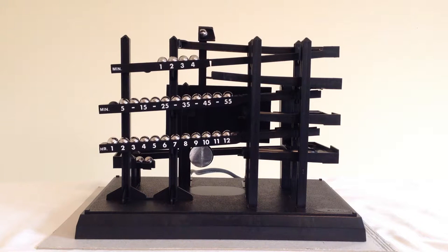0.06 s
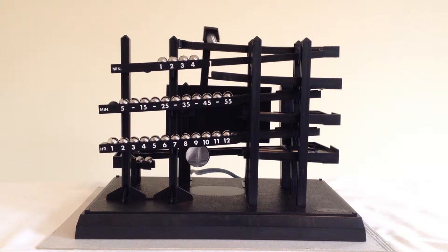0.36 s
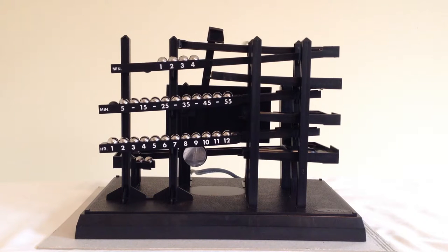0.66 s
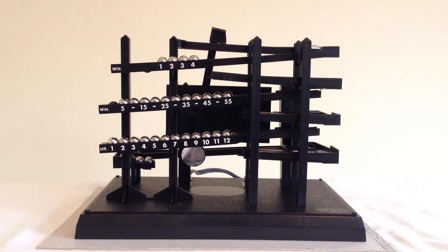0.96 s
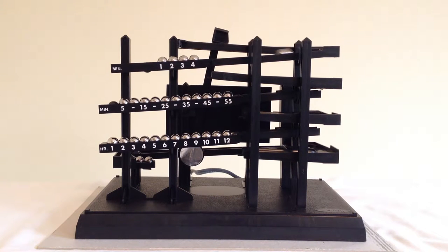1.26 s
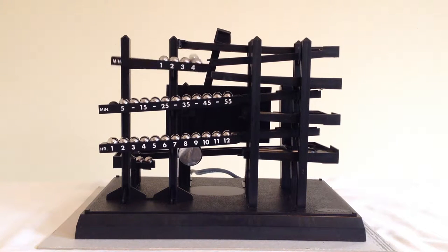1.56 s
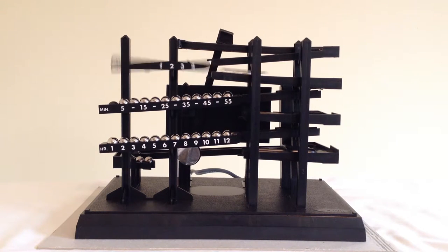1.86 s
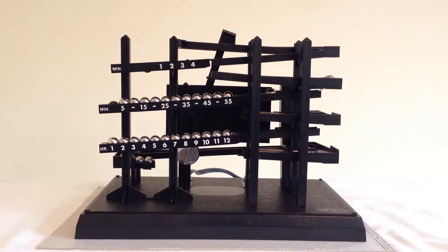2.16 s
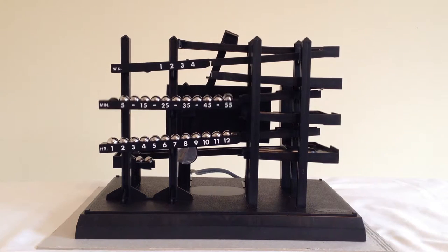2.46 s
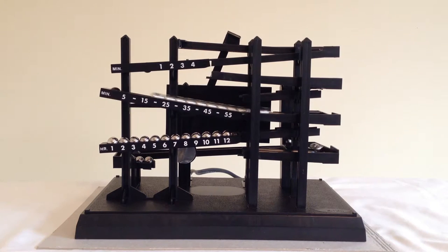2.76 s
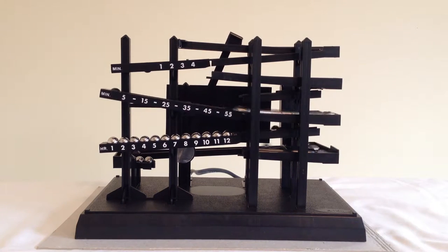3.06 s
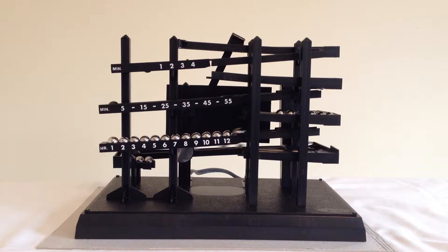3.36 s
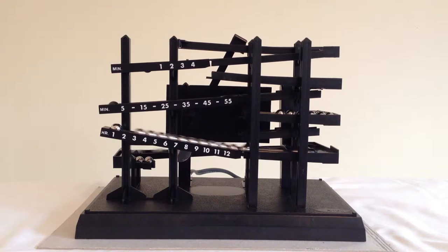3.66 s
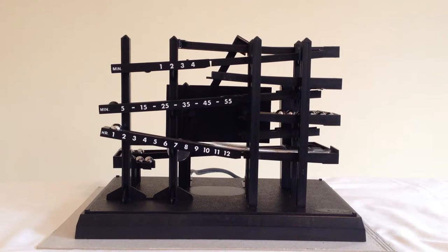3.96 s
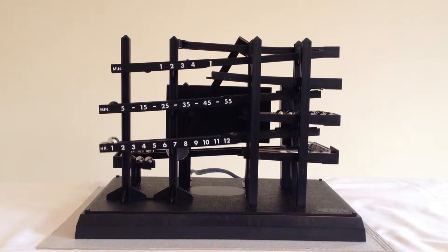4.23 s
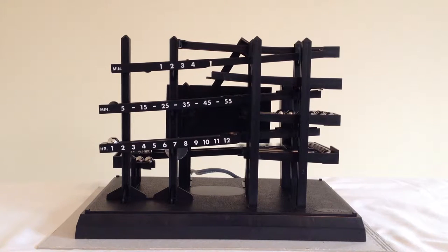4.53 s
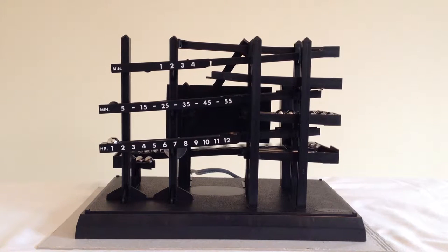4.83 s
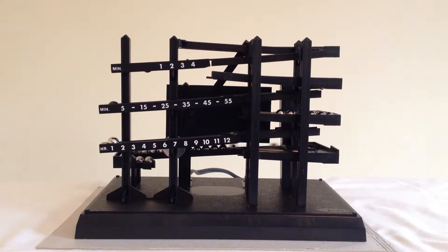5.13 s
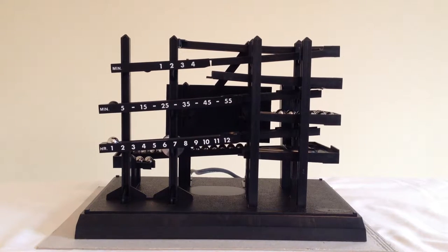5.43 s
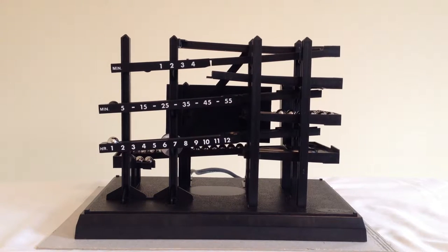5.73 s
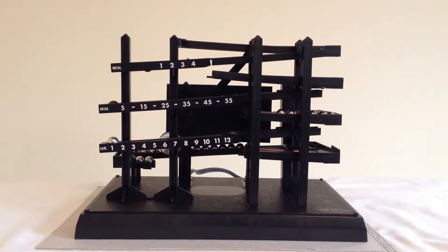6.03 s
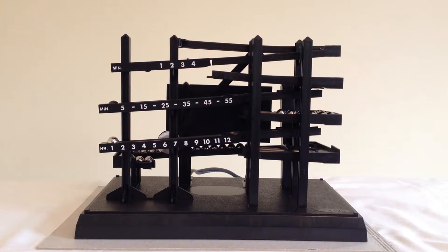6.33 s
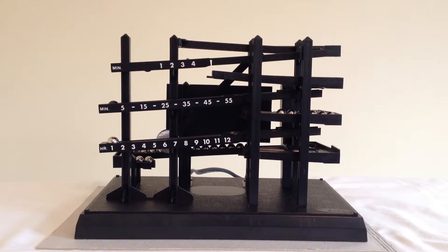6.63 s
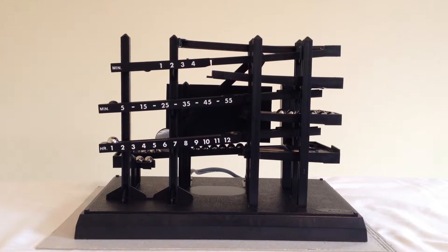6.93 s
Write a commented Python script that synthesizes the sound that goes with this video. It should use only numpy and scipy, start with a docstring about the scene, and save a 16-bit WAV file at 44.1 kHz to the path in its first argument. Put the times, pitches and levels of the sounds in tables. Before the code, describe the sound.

A rolling-ball clock is heard close by in a small room with a faint hiss. At about 0.4 seconds a steel ball drops onto a plastic track with a sharp click, then rolls with a faint hollow whir, ticking and gathering speed. From 1.6 to 2.2 seconds the first rail tips and its balls clatter down. A second, fuller spill follows from about 2.5 to 3.2 seconds, with a few bright clacks just after, and a third from 3.6 to 4.3 seconds. The balls rumble along the tracks between spills, the plastic frame rings briefly, and low thumps sit under the heavier hits. Around 4.9 to 5.3 seconds the returning balls strike each other in a quick run of steel clacks. Soft hollow knocks follow, clustering near 6 seconds, and the last faint bumps fade just after 7 seconds, leaving only the hiss.

```python
"""A small room: a rolling-ball clock turns the hour. The lift arm drops a steel ball on the top track;
it tips three plastic rails in turn. Their balls clatter down, rumble over the grain of the tracks and
clack into the queue, steel on steel. The plastic frame rings, and low thumps lie under the heavy blows.
A few soft knocks and bumps follow over a quiet hiss."""
import sys
import numpy as np
from scipy import signal
from scipy.io import wavfile

SR = 44100
rng = np.random.default_rng(int(sys.argv[2]) if len(sys.argv) > 2 else 0)


def int16_out(signal):
    """Quantize to a 16-bit WAV file."""
    q = np.round(np.clip(np.atleast_2d(signal).T, -1, 1) * 32767)
    wavfile.write(sys.argv[1], SR, q.astype(np.int16))


N = 317079
TIME_S = np.arange(N) / SR
BINS_HZ = abs(np.fft.fftfreq(4096, 1 / SR))

# tipped rails emptying: start/s, end/s, rumble/dB, rattle/dB, jostling blows/dB
POURS = [(1.699, 1.945, -40.5, -47.5, -35), (2.661, 3.167, -37.5, -40.5, -32.5),
         (3.664, 4.152, -39.5, -39, -37)]


def blows(contact_s=0.0011, chatter_s=0.011, rise_s=0.001, echo_s=0.0036, hardness_hz=3500):
    """Each blow: a hard contact, a quick early echo of it, then chatter through the loose rails."""
    # spectrum of a blow, and the extra of steel on steel: f/Hz, level/dB
    blow_colour = [(30, -38), (100, -24.5), (230, -22.5), (400, -13.5), (570, -8.5), (720, 1.5),
                   (1400, -0.5), (2500, -0.5), (4000, 4), (6000, -4.5), (9000, -6.5), (12800, -11),
                   (15200, -23)]
    steel_colour = [(5500, 0.5), (8000, 0), (13000, 5.5)]
    # spread of a blow's bass and treble over the spectrum: f/Hz, share/(dB per dB)
    bass_share = [(900, 0.61), (1900, 0.31)]
    treble_share = [(3200, 0.021), (8000, 1.1), (13000, 1.56)]
    t, out = np.arange(SR // 12) / SR, np.zeros(N)
    onset = SR // 100  # band levels refer to the first 10 ms
    rattle = grains(per_s=16000, spread_db=2.5)
    envelope = (1 - np.exp(-t / rise_s)) ** 2 * np.exp(-t / chatter_s)
    pole = np.exp(-2 * np.pi * hardness_hz / SR)
    for s, db, bass_db, treble_db, contact_db, steel in strikes():
        chatter = envelope * rattle[round(s * SR):][:len(t)]
        contact = unit(np.exp(-t / contact_s) * rng.standard_normal(len(t))) + unit(1. * (t == 0))
        contact = unit(signal.lfilter([1, -1], [1, -pole], contact))  # a small ball radiates little bass
        echo = amp(-2) * np.roll(contact, round(echo_s * rng.uniform(0.88, 1.2) * SR))
        force = amp(contact_db - 5) * (contact + echo) + unit(chatter)
        tone_db = curve(blow_colour) + steel * curve(steel_colour)
        tone_db += (bass_db - 7.5) * curve(bass_share) + (treble_db + 1) * curve(treble_share)
        sound = colour(force, tone_db + 3 * ripple(spacing_hz=330))
        bass = band(sound, 1400, "low")
        mid = band(sound, [1400, 6000], "band")
        treble = band(sound, 6000, "high") * np.exp(-10 * t)
        for part, gain_db in ((bass, bass_db - 2), (mid, -1), (treble, treble_db)):
            add(out, s, amp(db + gain_db) * part / np.std(part[:onset]))
    return out


def strikes():
    """All blows: t/s, level/dB, bass/dB, treble/dB, contact/dB, queue-clack flag."""
    # clicks and knocks of balls on rails, tracks and each other:
    # t/s, level/dB, relative bass/dB, treble/dB, first contact/dB
    hits = [(0.427, -36.5, -6, -7, -18), (0.4455, -24, -13.5, -4.5, 6.5), (0.908, -60.5, -4, -16, 0),
            (1.066, -54, -7, -14, -8), (1.1912, -41.5, -10, -15, 12), (1.539, -43, -5.5, -2, 0),
            (1.561, -40.5, -4.5, -3, 3), (1.584, -39, -11.5, -6.5, -6), (1.6527, -30.5, -9.5, -4.5, -5),
            (1.7118, -32.5, -2, -8, 4), (1.81, -31.5, -5.5, -5, -1), (1.8518, -30.5, -22, -6.5, 0),
            (1.8842, -30.5, -11, -8, -4), (2.017, -37.5, -3, -7.5, 2), (2.0476, -20.5, -8, -7, 3),
            (2.1325, -26.5, -10, -11, -12), (2.143, -21.5, -12.5, -1.5, -11), (2.17, -28.5, -2.5, -11.5, 4),
            (2.1963, -20, -21, -6, -4), (2.4396, -39, -7.5, -6, 0), (2.4934, -42, 1, -10, 19),
            (2.5232, -37.5, -11, -6.5, 5), (2.5629, -34.5, -1, -4, -3), (2.569, -29, 2, -11, 6),
            (2.589, -28.5, -8.5, -9.5, 4), (2.6569, -23, -1.5, -9.5, -20), (2.672, -30, -8, -4.5, 0),
            (2.718, -29.5, -2.5, -8, -10), (2.746, -33, 1, -6.5, 9), (2.8052, -30, 4.5, -4, -10),
            (2.8079, -28.5, -14, -4.5, -1), (2.897, -31, -7, -5.5, -7), (2.9206, -27.5, -5.5, -4.5, -2),
            (2.9702, -21, -7.5, -3, 4.5), (3.0708, -33, 0, -3, -17), (3.1077, -32, -1, -4.5, -4),
            (3.157, -31.5, -15, -5.5, 9), (3.2155, -30, -1.5, -7, -7), (3.439, -45.5, -6, -1, -16),
            (3.5247, -44, -5, -3, 9), (3.5456, -36.5, -12, -8, 9), (3.653, -37.5, -2, -7, -5),
            (3.6669, -29, -9.5, -3, -14), (3.718, -28.5, -9.5, -7.5, -1), (3.7516, -34.5, -8, -4.5, 12),
            (3.8167, -28, -7, -4.5, 2), (3.9589, -40, 4.5, -3, 4), (4.053, -31.5, -10, -4.5, -11),
            (4.0868, -30, -8.5, -4.5, 0), (4.1103, -31, -11, -5.5, -1), (4.1377, -26.5, -16, -6.5, 1),
            (4.1999, -26.5, -6.5, -8, -5), (4.2834, -33, -2, -9, -8), (4.344, -38.5, -15, -9, -16),
            (4.533, -40, -8.5, -8.5, -9), (4.562, -39, -7, -5, 9)]
    # returning balls strike the queue: t/s, level/dB, relative treble/dB
    clacks = [(3.254, -32, -1), (3.266, -31, 4.5), (3.283, -29, 1.5), (3.301, -25.5, -7),
              (4.1768, -38, 1.5), (4.9022, -36, 3), (4.9833, -31, -3.5), (5.0166, -30, -2),
              (5.0235, -31.5, -3), (5.052, -29.5, -4.5), (5.096, -31, -2.5), (5.1343, -35.5, 0),
              (5.142, -31, -4), (5.1758, -30, -3.5), (5.225, -30, -4.5), (5.267, -31, -3.5),
              (5.337, -34, -2)]
    clatter = [(*hit, False) for hit in hits]
    # brighter clack, harder contact
    queue = [(s, db, -9.5, treble_db, 1.5 + 0.39 * treble_db, True) for s, db, treble_db in clacks]
    return clatter + queue + jostles()


def jostles(per_s=20, spread_db=2.5, slots=24):
    """Balls drop off an emptying rail at uneven intervals; rows as in strikes()."""
    rows = []
    for start, end, _, _, mean_db in POURS:
        times_s = start + (np.arange(slots) + rng.random(slots)) / per_s
        levels_db = mean_db + spread_db * rng.standard_normal(slots)
        rows += [(s, db, -6, -5, 1.5, False) for s, db in zip(times_s, levels_db) if s < end]
    return rows


def rolling(jolt_db=3, jolts_per_s=50, hop=N // 56):
    """Balls rumble over the grain of the plastic; where they crowd, they tick against each other."""
    # spectra of rumble and ticks: f/Hz, level/dB
    roll_colour = [(40, -27), (150, -36.5), (450, -12.5), (800, 4.5), (1060, -2.5), (1340, 5), (1750, 2.5),
                   (2300, 2), (4200, -1.5), (6200, -7.5), (8000, -19), (15000, -25.5)]
    tick_colour = [(200, -39), (800, -17.5), (3000, 10.5), (7000, 11), (11000, 3), (15000, -27.5)]
    rumble_db, tick_db = traffic()
    jolts = np.interp(TIME_S * jolts_per_s, np.arange(400), rng.standard_normal(400))
    force = grains(per_s=2500, spread_db=3.3) * amp(rumble_db - 3 + jolt_db * jolts)
    rumble = np.zeros(N)
    for start in range(0, N - 2 * hop, hop):
        stretch = force[start:start + 2 * hop] * signal.windows.cosine(2 * hop)
        # a lone quiet ball picks out a few resonances; a crowd evens them out
        spot_db = np.interp(rumble_db[start + hop], [-58, -50], [5.5, 3])
        add(rumble, start / SR, colour(stretch, curve(roll_colour) + spot_db * ripple(spacing_hz=150)))
    ticks = grains(per_s=700, spread_db=3.5) * amp(tick_db - 4)
    return rumble + colour(ticks, curve(tick_colour))


def traffic():
    """Rumble/dB and rattle/dB over time: power sum of all runs and pours."""
    # balls on a track: start/s, end/s, final level/dB, gain with speed/dB, relative rattle/dB
    runs = [(0.62, 1.625, -53.5, 16.5, -33), (1.93, 2.178, -38, 13, -21.5), (2.238, 2.61, -44, 13, -22),
            (3.323, 3.65, -53, 3.5, -24), (4.2, 5.1, -47, 3, -6)]
    rumble, rattle = np.full((2, N), 1e-12)
    for start, end, db, gained_db, rattle_db in runs:
        power = (amp(db) * swell(start, end, gained_db, fade_db_per_s=139.5)) ** 2
        rumble += power
        rattle += power * amp(rattle_db) ** 2
    for start, end, rumble_db, rattle_db, _ in POURS:
        gain = swell(start, end, gained_db=0, fade_db_per_s=75)
        rumble += (amp(rumble_db) * gain) ** 2
        rattle += (amp(rattle_db) * gain) ** 2
    return 10 * np.log10(rumble), 10 * np.log10(rattle)


def swell(start_s, end_s, gained_db, fade_db_per_s, rise_db_per_s=595.5):
    """Rolling sets in quickly, grows with speed, then dies away."""
    to_go = np.clip((end_s - TIME_S) / (end_s - start_s), 0, 1)
    before_s, after_s = np.maximum(start_s - TIME_S, 0), np.maximum(TIME_S - end_s, 0)
    return amp(-gained_db * to_go - rise_db_per_s * before_s - fade_db_per_s * after_s)


def ripple(spacing_hz):
    """Random peaks and dips: each spot on a track favours other resonances; the bass varies least."""
    peaks = np.interp(BINS_HZ / spacing_hz, np.arange(1000), rng.standard_normal(1000))
    return peaks * np.minimum(BINS_HZ / 1500, 1)


def frame(x):
    """The plastic frame passes every blow on and rings with its own modes."""
    # frame and hollow base: f/Hz, width/Hz, level/dB re the plain blow
    modes = [(91.7, 3.9, -9.5), (158, 9, 2.5), (370.4, 10, 4), (695, 50, 0.5), (870.4, 19, 3),
             (902, 4.2, 10.5), (1155, 15, 6.5), (1343, 39, -2.5), (1450, 13, 1), (1570, 30, 0.5),
             (1910, 30, 0), (2165, 190, 2.5), (2568, 90, 1.5), (2850, 47, 0.5)]
    return amp(-1.5) * (x + sum(amp(db) * resonate(x, hz, width_hz) for hz, width_hz, db in modes))


def knocks(roughness=1.13, width_hz=380, rise_s=0.0018):
    """Hollow thuds with a scuff: early ones from the rails, soft ones after the balls settle."""
    # t/s, thud/dB, thud f/Hz, scuff/dB, decay/s
    events = [(0.441, -47, 680, -56, 0.0086), (4.18, -26, 1300, -44, 0.0063), (5.481, -48, 468, -60, 0.019),
              (5.75, -56.5, 389, -55.5, 0.039), (5.784, -59, 432, -48, 0.02),
              (5.967, -56, 336, -55.5, 0.019), (5.986, -54.5, 398, -50.5, 0.032),
              (6.024, -48, 403, -59, 0.022), (6.039, -44, 403, -45, 0.012), (6.05, -47, 400, -43, 0.015),
              (6.092, -46, 437, -61, 0.016), (6.192, -64, 393, -70, 0.059),
              (6.494, -71.5, 332, -68.5, 0.041), (6.973, -63, 438, -71.5, 0.028),
              (7.114, -65.5, 443, -63.5, 0.056)]
    # f/Hz, level/dB
    scuff_colour = [(30, -22), (110, -28), (230, -11), (600, -3.5), (1400, 2.5), (2000, 3.5), (2700, -5),
                    (5500, -18.5), (12000, -34)]
    t, out = np.arange(SR // 5) / SR, np.zeros(N)
    for s, thud_db, hz, scuff_db, decay_s in events:
        push, rub = rng.standard_normal((2, len(t)))
        envelope = (1 - np.exp(-t / rise_s)) * np.exp(-t / decay_s)
        hollow = unit(resonate(resonate(push, hz, width_hz), hz, width_hz))
        thud = unit(envelope * (unit(np.sin(2 * np.pi * hz * t)) + roughness * hollow))
        scuff = unit(envelope * colour(rub, curve(scuff_colour)))
        add(out, s, (amp(thud_db - 1) * thud + amp(scuff_db) * scuff) / unit(envelope).max())
    return out


def thumps(decay_s=0.026):
    """Short low thumps: under the heavy blows, then soft bumps after the balls settle."""
    # t/s, level/dB
    events = [(1.195, -58.5), (1.712, -54), (2.196, -55), (2.569, -49), (2.657, -49.5), (2.727, -49),
              (2.805, -51.5), (5.481, -55), (6.047, -54.5), (6.52, -69), (6.71, -69.5)]
    # f/Hz, level/dB
    thump_colour = [(30, -26.5), (80, -6.5), (150, 3), (215, -6.5), (350, 4), (520, 1), (900, -32),
                    (3000, -70.5)]
    t, out = np.arange(SR // 5) / SR, np.zeros(N)
    for s, db in events:
        thump = colour(rng.standard_normal(len(t)) * np.exp(-t / decay_s), curve(thump_colour))
        add(out, s, amp(db) * thump / np.std(thump[:SR // 40]))
    return out


def lift(hz=850, width_hz=240, db=-70):
    """Faint hollow whir: the first ball leaves the lift arm and runs along the top track."""
    whir = resonate(resonate(rng.standard_normal(N), hz, width_hz), hz, width_hz)
    return amp(db) * unit(whir) * np.interp(TIME_S, [0.32, 0.35, 1.4, 1.7], [0, 1, 1, 0])


def room(x, wet_db, tilt_db_per_10khz, gap_s=0.009, echoes_per_s=4000):
    """Short tail of sparse reflections; the treble dies first."""
    # f/Hz, t60/s
    decay = [(500, 0.31), (2200, 0.23), (14000, 0.2)]
    out, t = x.copy(), np.arange(SR // 2) / SR
    for k in range(3):
        taps = rng.choice([-1., 1.], len(t)) * (rng.random(len(t)) < echoes_per_s / SR) * (t > gap_s)
        hz, delay_s, spectra = signal.stft(taps, SR, nperseg=256)
        fade_db = -60 * delay_s / curve(decay, hz)[:, None] + tilt_db_per_10khz * hz[:, None] / 10000
        tail = signal.istft(spectra * amp(fade_db), SR, nperseg=256)[1]
        # moving balls change the path: three tails crossfade at 1 Hz
        share = np.sqrt(2 / 3) * np.cos(2 * np.pi * (TIME_S + k / 3))
        out += amp(wet_db) * signal.fftconvolve(x * share, tail / np.linalg.norm(tail))[:N]
    return out


def hiss(db=-66):
    """Faint room rumble and microphone hiss."""
    # f/Hz, density/dB
    spectrum = [(15, -28), (25, -21), (81, -8.5), (172, -13), (488, -15.5), (1210, -17), (2020, -20),
                (2930, -19.5), (15000, -23.5)]
    return amp(db) * unit(colour(rng.standard_normal(N), curve(spectrum)))


def grains(per_s, spread_db):
    """Random tiny contacts, a few much stronger than the rest."""
    size = amp(spread_db * np.minimum(rng.exponential(1, N), 4))
    return unit(size * rng.choice([-1, 1], N) * (rng.random(N) < per_s / SR))


def colour(x, gain_db):
    """Minimum-phase filter of unit energy; one gain for each of BINS_HZ."""
    log_response = signal.hilbert(np.log(amp(gain_db))).conj()
    taps = np.fft.ifft(np.exp(log_response)).real[:len(BINS_HZ) // 2]
    return signal.fftconvolve(x, taps / np.linalg.norm(taps))[:len(x)]


def band(x, hz, kind):
    """Third-order Butterworth filter."""
    return signal.sosfilt(signal.butter(N=3, Wn=hz, btype=kind, fs=SR, output="sos"), x)


def resonate(x, hz, width_hz):
    """One resonance of unit gain."""
    r = np.exp(-np.pi * width_hz / SR)
    return 2 * signal.lfilter([1 - r], [1, -r * np.exp(2j * np.pi * hz / SR)], x).real


def curve(points, hz=BINS_HZ):
    """Joins (f/Hz, value) points on a log-frequency axis."""
    f, value = np.transpose(points)
    return np.interp(np.log(hz + 1), np.log(f + 1), value)


def amp(db):
    """dB to gain."""
    return 10 ** (np.asarray(db) / 20)


def unit(x):
    """Scales to unit rms."""
    return x / np.sqrt(np.mean(x ** 2) + 1e-20)


def add(mix, s, sound):
    """Mixes a sound in at time s."""
    part = mix[round(s * SR):][:len(sound)]
    part += sound[:len(part)]


def scene():
    """The clock on its table, close by; mono."""
    around = lift() + room(knocks() + thumps(), wet_db=-5.5, tilt_db_per_10khz=3.5) + hiss()
    clock = room(frame(rolling() + blows()), wet_db=-8.5, tilt_db_per_10khz=0.5)
    return (clock + around)[None]


def record(dry):
    """Steep low-pass at 15550 Hz."""
    taps = signal.firwin(255, 15550, window=("kaiser", 8), fs=SR)
    return signal.oaconvolve(dry, taps[None], "same")


dry = scene()
out = record(dry)
int16_out(out)
```